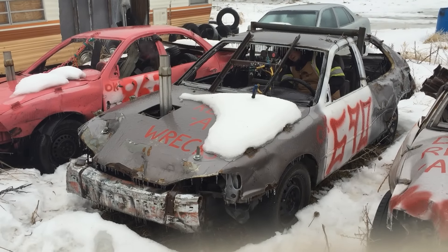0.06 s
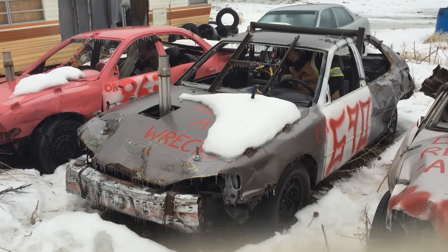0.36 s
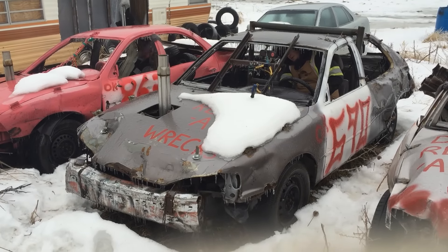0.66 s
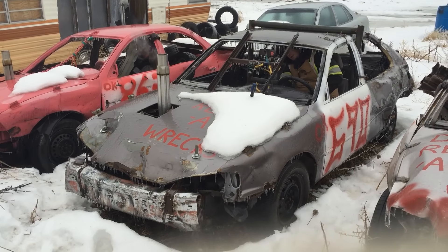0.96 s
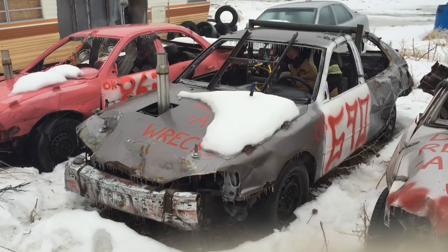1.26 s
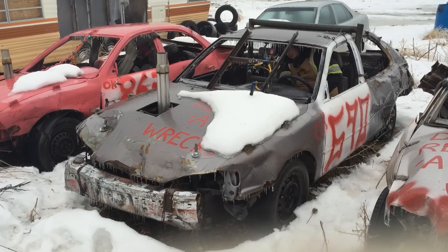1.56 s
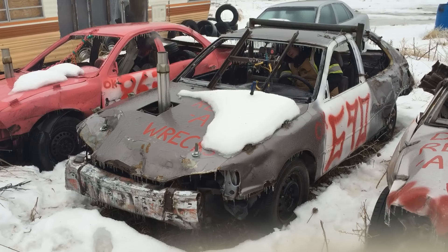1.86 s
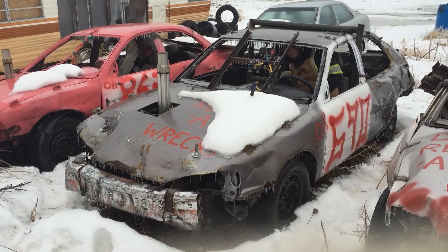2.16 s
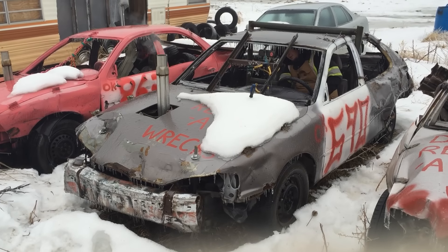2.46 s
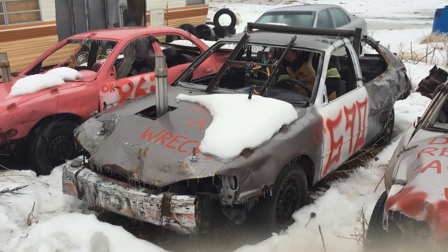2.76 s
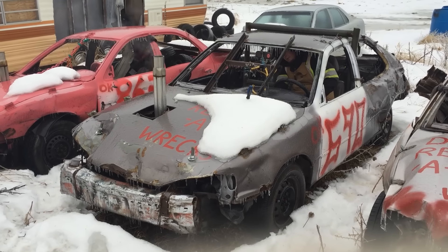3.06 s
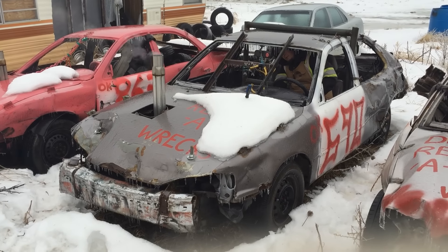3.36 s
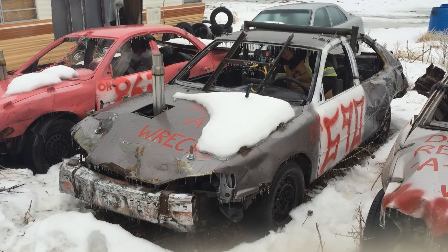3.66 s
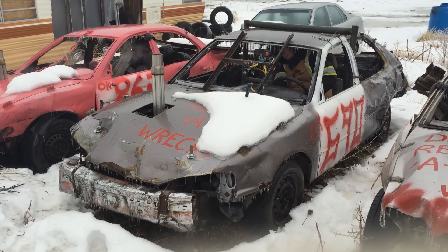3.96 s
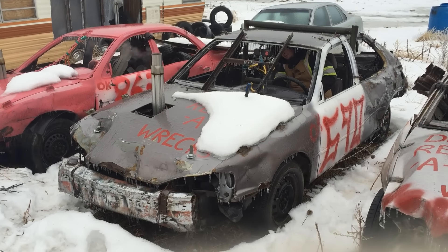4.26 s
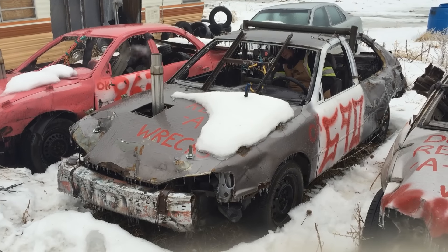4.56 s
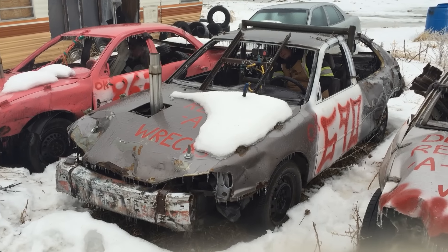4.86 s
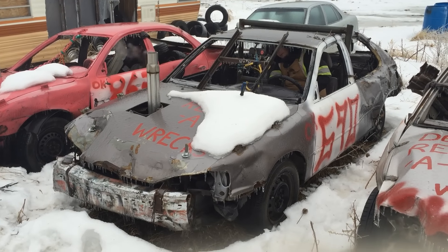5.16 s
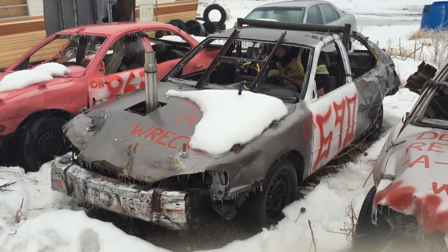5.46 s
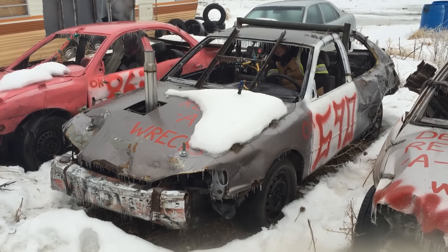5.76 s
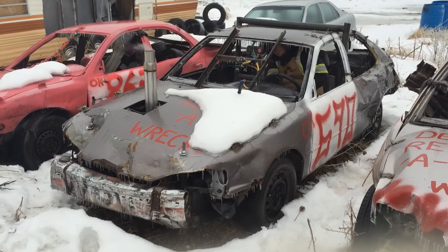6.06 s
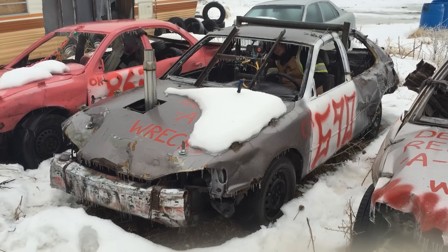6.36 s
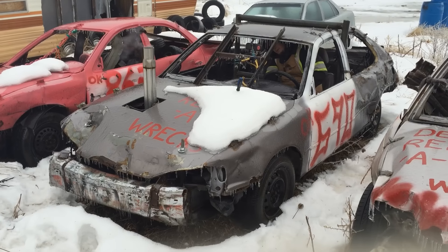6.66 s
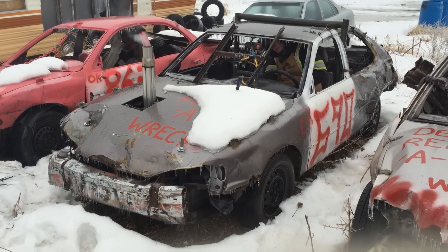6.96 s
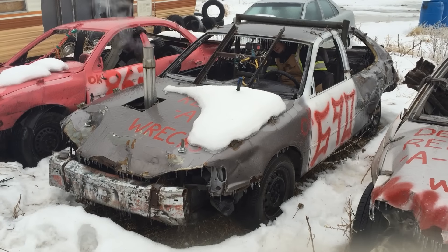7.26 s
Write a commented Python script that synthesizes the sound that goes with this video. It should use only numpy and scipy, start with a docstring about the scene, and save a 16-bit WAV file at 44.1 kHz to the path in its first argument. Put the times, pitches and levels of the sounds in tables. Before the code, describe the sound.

Starter gears grind in a labored, irregular rhythm as a car engine turns over without starting. Quick hisses and thin whistles come between the strokes, and scattered misfires crack and boom in the exhaust over a faint rumble. Near the end comes a ragged run of dull puffs, then more backfires as the cranking continues. It is heard from a few metres off in an open yard with almost no echo.

```python
"""Cold engine that will not start.

A four-cylinder car with an open exhaust stack is cranked in a snowy yard and never catches.
The starter gears grind and sag in pitch against each compression; air hisses and whistles out of
the engine. Stray firings spit, boom in the stack and break into a short sputter."""
import sys
import numpy as np
from scipy import signal
from scipy.fft import rfft, irfft, next_fast_len
from scipy.io import wavfile
from scipy.ndimage import map_coordinates

SR = 44100
rng = np.random.default_rng(int(sys.argv[2]) if len(sys.argv) > 2 else 0)


def unload_audio(sound):
    """Save the sound as a 16-bit wav file, at the path given as the first command line argument."""
    columns = np.transpose(np.atleast_2d(sound))
    # keep every value between -1 and 1, then stretch to whole-number steps
    steps = np.round(np.clip(columns, -1, 1) * 32767)
    wavfile.write(sys.argv[1], SR, steps.astype(np.int16))


N = 327222
T = np.arange(N) / SR


def amp(db):
    """Decibels to gain."""
    return 10 ** (np.asarray(db) / 20)


def unit(x):
    """Scale to rms 1."""
    return x / np.sqrt(np.mean(x ** 2) + 1e-20)


def wobble(rate_hz):
    """Smooth random curve, rate_hz knots a second."""
    return map_coordinates(rng.standard_normal(int(N * rate_hz / SR) + 4), [T * rate_hz])


def noise(rough_db=0, rate_hz=400):
    """White noise of rms 1 whose strength flutters."""
    return unit(rng.standard_normal(N) * amp(rough_db * wobble(rate_hz)))


def phase_of(hz):
    """Running phase in radians of a varying frequency."""
    return 2 * np.pi * np.cumsum(hz) / SR


def swell(peak_s, rise_s, fall_s, shape=1.53):
    """Hump of height 1 at peak_s."""
    return np.exp(-np.abs((T - peak_s) / np.where(T < peak_s, rise_s, fall_s)) ** shape)


def burst(start_s, attack_s, decay_s):
    """Quick rise, exponential fall."""
    t = np.maximum(T - start_s, 0)
    return (1 - np.exp(-t / attack_s)) * np.exp(-t / decay_s)


def colour(x, spectrum, resonances=()):
    """Causal filter from (Hz, dB) points plus resonance humps; keeps the power of white noise."""
    size = 2 * next_fast_len(N // 2 + SR // 4)
    hz = np.fft.rfftfreq(size, 1 / SR)
    points_hz, points_db = np.transpose(spectrum)
    db = np.interp(np.log(hz + 1), np.log(points_hz + 1), points_db)
    for centre_hz, width_hz, hump_db in resonances:
        db += hump_db / (1 + (2 * (hz - centre_hz) / width_hz) ** 2)
    cepstrum = irfft(np.log(unit(amp(db))), size)
    cepstrum[1:size // 2] *= 2  # fold to minimum phase
    cepstrum[size // 2 + 1:] = 0
    return irfft(rfft(x, size) * np.exp(rfft(cepstrum)), size)[:N]


def cavity(x, spacing_hz, feedback):
    """Waves bouncing inside a cavity make evenly spaced resonances."""
    size = next_fast_len(N + SR // 4)
    round_trip = np.exp(-2j * np.pi * np.fft.rfftfreq(size, 1 / SR) / spacing_hz)
    return irfft(rfft(x, size) * np.sqrt(1 - feedback ** 2) / (1 - feedback * round_trip), size)[:N]


def yard(x, wet_db=-13, t60_s=0.18):
    """Short scatter from the engine bay and the cars around; snow swallows the rest."""
    t = T[:SR // 4]
    tail = rng.standard_normal(len(t)) * amp(-60 * t / t60_s) * (t > .003)
    above_bass = signal.sosfilt(signal.butter(2, 400, "high", fs=SR, output="sos"), x)
    return x + amp(wet_db) * signal.fftconvolve(above_bass, tail / np.linalg.norm(tail))[:N]


# Body shake. Each row: time in seconds, level in dB.
RUMBLE_LEVELS = [(0, -38), (.93, -47.5), (1.4, -35), (2.0, -45.5), (2.6, -41.5), (4.7, -42.5), (5.6, -33.5),
                 (7.4, -36.5)]
# Body shell response. Each row: frequency in Hz, relative gain in dB.
BODY_SPECTRUM = [(25, -32), (45, 0), (65, -1.5), (100, -2.5), (160, -14.5), (300, -16), (600, -35.5),
                 (1200, -62)]


def rumble():
    """The rocking engine shakes the bare body shell."""
    level_db = np.interp(T, *np.transpose(RUMBLE_LEVELS))
    return amp(level_db) * colour(noise(), BODY_SPECTRUM, [(62.4, 42, 4.0)])


# Late burning. Each row: start in seconds, level in dB, brightness in dB.
PUFFS = [(.415, -31, -13), (5.485, -27.5, -16), (5.813, -24.5, -13), (5.86, -23, -21), (5.934, -17.5, -1.5),
         (6.081, -16, -24), (6.119, -12.5, -9), (6.22, -17.5, -23), (6.273, -15, -10), (6.343, -16, -0.5),
         (6.385, -16.5, -12), (7.11, -23.5, -15)]
# A puff's dull body and brighter flutter. Each row: frequency in Hz, relative gain in dB.
PUFF_SPECTRUM = [(30, -17), (70, 2), (130, 0.5), (200, -5), (330, -18), (700, -61)]
FLUTTER_SPECTRUM = [(80, -7.5), (180, 4), (330, 2), (600, -10.5), (1000, -25), (2500, -55)]


def sputter(puff_decay_s=0.033, wake_db=-26, wake_decay_s=0.1):
    """Unburnt fuel flares in ragged puffs; every boom also leaves a turbulent wake in the pipe."""
    dull, bright = np.zeros(N), np.zeros(N)
    for s, _, _, boom_db in FIRINGS:
        dull += amp(boom_db + wake_db) * burst(s + BOOM_DELAY_S, 0.0063, wake_decay_s)
    for s, db, bright_db in PUFFS:
        puff = amp(db) * burst(s, 0.0023, puff_decay_s)
        dull += puff
        bright += puff * amp(bright_db)
    eddies = colour(dull * noise(rough_db=3), PUFF_SPECTRUM)
    flutter = colour(bright * noise(rough_db=3), FLUTTER_SPECTRUM)
    return eddies + flutter


# Flames in the pipe. Each row: start in seconds, relative level in dB, life in seconds.
FLAMES = [(1.171, -20.5, 0.13), (1.482, -24, 0.13), (5.821, -17.5, 0.079), (6.917, -16.5, 0.037)]
# A flame's note. Each row: time since lighting in seconds, pitch in Hz.
FLAME_PITCH = [(0, 59.6), (.04, 57.7), (.085, 99), (.13, 103), (.25, 100.8)]


def hoots(gain_db=3.5, third_harmonic_db=-27, fade_s=0.056):
    """A flame keeps the pipe sounding; its note climbs as the gas heats."""
    out = np.zeros(N)
    for s, db, life_s in FLAMES:
        t = np.clip(T - s, 0, 1)
        phase = phase_of(np.interp(t, *np.transpose(FLAME_PITCH)) * (t > 0))
        flame = (1 - np.exp(-t / 0.0011)) / np.sqrt(1 + np.exp(2 * (t - life_s) / fade_s))
        out += amp(db + gain_db) * flame * (np.sin(phase) + amp(third_harmonic_db) * np.sin(3 * phase))
    return out


def pressure_pulses(boom_attack_s=0.0037, push_db=-19, push_lag_s=0.01396, push_attack_s=0.025):
    """Firings boom, compressions push softly. Each row: start in seconds, dB, attack in seconds."""
    pulses = [(s + BOOM_DELAY_S, db, boom_attack_s) for s, _, _, db in FIRINGS]
    whistles_s = [s for s, *_, whistle_db in VALVE_LEAKS if whistle_db > 0]
    for s, _, load_s in compressions():
        whistled_away = any(s < leak_s < s + load_s for leak_s in whistles_s)
        if not whistled_away:
            pulses.append((s + load_s + push_lag_s, push_db, push_attack_s))
    return pulses


# Exhaust stack modes. Each row: resting frequency in Hz, relative level in dB, T60 in seconds.
STACK_MODES = [(64.56, -10, 0.55), (75.8, 0, 0.16), (123.3, -3, 0.26), (169.3, -13.5, 0.62)]


def stack(soft_hz=45, hot_sharpening=0.09, cooling_s=0.032):
    """Pressure pulses ring the stack, sharp while the gas is hot; slow ones favour the lowest mode."""
    out, t = np.zeros(N + SR), T[:SR // 2]
    lowest_hz = STACK_MODES[0][0]
    warped_s = np.cumsum(1 + hot_sharpening * np.exp(-t / cooling_s)) / SR
    for s, db, attack_s in pressure_pulses():
        onset = amp(db) * (1 - np.exp(-t / attack_s))
        for hz, mode_db, t60_s in STACK_MODES:
            scatter = rng.standard_normal()
            reach = 1 / np.hypot(1, attack_s * (hz - lowest_hz) * hz / soft_hz)
            decay = amp(mode_db + 0.82 * scatter - 60 * t / t60_s)
            tone = np.sin(2 * np.pi * hz * (1 + 0.022 * scatter) * warped_s)
            out[round(s * SR):][:len(t)] -= onset * reach * decay * tone
    return out[:N]


# Single cylinder firings. Each row: blast peak in seconds, then relative blast, bark and boom in dB.
FIRINGS = [(1.488, -20.5, -23, -13.5), (2.525, -13, -27, -13.5), (3.019, -14, -35, -9.5),
           (3.475, -15, -33, -7.5), (5.247, -13.5, -21.5, -6), (5.812, -20, -19, -20),
           (6.779, -15, -14.5, -5.5), (7.42, -23.5, -16.5, -20)]
BOOM_DELAY_S = 0.01875  # from blast to stack
# Sharp backfires. Each row: peak in seconds, relative jet dB, jet fall in seconds, relative bark dB.
BACKFIRES = [(.181, -22.5, 0.032, -25.5), (1.169, -23, 0.0042, -20.5), (6.912, -19, 0.0027, -13),
             (7.38, -17.5, 0.028, -31.5)]


def barks(gain_db=5, lead_s=0.0067, firing_decay_s=0.019, backfire_decay_s=0.011):
    """A misfire cracks through the midrange; the shorter it is, the sharper it starts."""
    cracks = [(s, db, firing_decay_s) for s, _, db, _ in FIRINGS]
    cracks += [(s, db, backfire_decay_s) for s, _, _, db in BACKFIRES]
    force = sum(amp(db) * burst(s - lead_s, 0.25 * decay_s, decay_s) for s, db, decay_s in cracks)
    return amp(gain_db) * crackle(force)


# Midrange crack. Each row: frequency in Hz, relative gain in dB.
BARK_SPECTRUM = [(100, -13), (280, 10.5), (430, -4), (800, -3), (1100, 0.5), (2100, 2.5), (3500, -25),
                 (9000, -32)]


def crackle(force):
    """The rough noise of a bark."""
    return colour(force * noise(rough_db=2.5), BARK_SPECTRUM)


# Compressed air past a valve. Each row: peak in seconds, relative dB, rise in seconds, whistle in dB.
VALVE_LEAKS = [(.226, -24, 0.023, 1.5), (.378, -23, 0.036, -21), (.84, -25.5, 0.042, 4),
               (1.075, -25, 0.057, -28), (1.366, -23.5, 0.031, 4.5), (1.866, -24, .04, 4),
               (2.07, -23.5, .043, -29), (3.946, -25, .037, -1.5), (4.125, -31, 0.052, -9),
               (4.619, -25, .034, 2.5), (4.797, -29.5, .03, -17), (5.691, -27, .04, 3),
               (6.164, -28, 0.034, 2), (7.029, -19.5, 0.021, 0)]


def escapes(leak_fall_s=.026, backfire_rise_s=0.0041, backfire_whistle_db=4.5, blast_fall_s=0.0098):
    """All gas jets. Each row: peak in seconds, relative dB, rise and fall in seconds, whistle in dB."""
    rows = [(s, db, rise_s, leak_fall_s, whistle_db) for s, db, rise_s, whistle_db in VALVE_LEAKS]
    rows += [(s, db, backfire_rise_s, fall_s, backfire_whistle_db) for s, db, fall_s, _ in BACKFIRES]
    for s, db, *_ in FIRINGS:
        rows += [(s - .012, db - 16, 0.019, blast_fall_s, 4),  # blow-by whistles out first
                 (s, db, 0.014, blast_fall_s, 1),  # blast
                 (s + 0.034, db - 17.5, 0.027, 0.058, -6)]  # thin exhaust hiss trails off
    return rows


# Port hiss, throat whistle and thin spray. Each row: frequency in Hz, relative gain in dB.
HISS_SPECTRUM = [(80, -33), (200, -5.5), (450, -9.5), (900, -5), (2000, -1), (3400, -4), (5500, -6),
                 (8000, -4.5), (10500, -15.5), (12500, -11), (15800, -18)]
THROAT_SPECTRUM = [(1500, -54.5), (2700, -14), (3300, -8), (4100, -5), (4700, -17), (6000, -37.5),
                   (12000, -39)]
SPRAY_SPECTRUM = [(3000, -23), (7000, 3), (13500, 6)]
# Port and throat resonances. Each row: centre in Hz, width in Hz, boost in dB.
PORT_MODES = [(1192, 14, 10), (8060, 150, -7), (9110, 140, 2), (11740, 170, 7.5)]
THROAT_MODES = [(3257, 82, 10.5), (3320, 105, -5), (3920, 910, 0), (5390, 180, 20.5)]


def jets(hiss_db=1, whistle_db=-1, spray_db=-4, edge_hz=4010, edge_db=-10, steepness=1.31):
    """Gas hisses through the ports; it sounds the throat near 4 kHz or sprays out thin and bright."""
    flow, tonal, thin = np.zeros((3, N))
    for s, db, rise_s, fall_s, tone_db in escapes():
        speed = swell(s, rise_s, fall_s)
        rush = amp(db) * speed ** steepness  # hiss grows faster with speed than the whistle
        flow += rush
        tonal += amp(db + tone_db) * speed
        thin += rush * max(1 - amp(tone_db), 0)
    hiss = colour(flow * noise(rough_db=1.8, rate_hz=800), HISS_SPECTRUM, PORT_MODES)
    whistle = colour(tonal * noise(rough_db=0.5, rate_hz=300), THROAT_SPECTRUM, THROAT_MODES)
    spray = colour(thin * noise(rough_db=2.2), SPRAY_SPECTRUM, PORT_MODES)
    flap = 1 + .04 * wobble(250)  # the jet flaps over the valve's edge
    edge = tonal * unit(amp(2.7 * wobble(300)) * np.sin(phase_of(edge_hz * flap)))
    return amp(hiss_db) * hiss + amp(whistle_db) * whistle + amp(spray_db) * spray + amp(edge_db) * edge


# The pinion catches up with the flywheel. Each entry: time in seconds.
REGRIPS_S = [.327, 3.647, 5.406, 7.126]


def squeaks(level_db=-22, overrun_s=0.0814, pitch_hz=1650, glide=0.037, clack_db=-5, clack_s=0.0093):
    """The overrun clutch slips after each ignition and regrips: a falling note and a clack of teeth."""
    notes, knocks = np.zeros(N), np.zeros(N)
    waver = 1 + 0.019 * wobble(300)
    slips_s = [s + overrun_s for s, *_ in [*FIRINGS, *BACKFIRES]]
    for s in [*slips_s, *REGRIPS_S]:
        hz = pitch_hz * waver * (1 - glide * np.tanh((T - s) / 0.0053))
        notes += swell(s, 0.0033, 0.0075) * np.sin(phase_of(hz))
        knocks += burst(s - .003, 0.0023, clack_s)
    clacks = colour(knocks * noise(), GEAR_SPECTRUM, HOUSING_MODES)
    return amp(level_db) * (notes + amp(clack_db) * clacks)


# The starter takes up a compression. Each entry: start in seconds.
STROKES_S = [.003, .17, .318, .467, .644, .785, .958, 1.247, 1.325, 1.565, 1.696, 1.82, 1.992, 2.186, 2.375,
             2.592, 2.725, 2.873, 3.088, 3.199, 3.339, 3.545, 3.641, 3.766, 3.91, 4.06, 4.258, 4.422, 4.555,
             4.738, 4.934, 5.1, 5.32, 5.4, 5.517, 5.655, 5.892, 5.998, 6.135, 6.272, 6.475, 6.64, 6.853,
             6.99, 7.117, 7.249]


def compressions(level_db=-27, load_share=.63, longest_s=.125, relief_db=-3.5, relief_s=.14):
    """Starter loads, eased by a fresh firing. Each row: start in seconds, dB, load time in seconds."""
    rows = []
    for s, stroke_s in zip(STROKES_S, np.diff(STROKES_S, append=N / SR)):
        relief = sum(np.exp((fired_s - s) / relief_s) for fired_s, *_ in FIRINGS if fired_s < s)
        load_s = min(load_share * stroke_s, longest_s) * np.exp(-.5 * relief)
        rows.append((s, level_db + relief_db * relief, load_s))
    return rows


# Slowing under compression. Each row: elapsed share of the load time, tooth rate in Hz.
TOOTH_RATE_SAG = [(0, 1326), (.28, 1211), (.52, 1033), (.78, 872.3), (1.1, 776.2), (1.7, 742.5)]


def gear_load(attack_s=0.0023, release_s=0.014, clash=0.18, slowing_db=-3):
    """Load and tooth rate: each compression slows the gears, which run slack past top centre."""
    load, tooth_hz = np.zeros(N), np.full(N, float(TOOTH_RATE_SAG[0][1]))
    for s, db, load_s in compressions():
        start = round(s * SR)
        t = T[:N - start][:SR // 2]
        span = slice(start, start + len(t))
        take_up = (1 - np.exp(-t / attack_s)) * (1 + clash * np.exp(-t / 0.024))  # backlash jolts shut
        level = amp(db + slowing_db * np.minimum(t / load_s, 1) ** 2)
        let_go = 1 / np.sqrt(1 + np.exp(np.minimum(2 * (t - load_s) / release_s, 60)))
        load[span] += level * take_up * let_go
        tooth_hz[span] = np.interp(t / load_s, *np.transpose(TOOTH_RATE_SAG))
    return load, tooth_hz


# Gear tones. Each row: multiple of the tooth rate, relative level in dB.
GEAR_TONES = [(1, 5), (1.2, -1.5), (2, 5), (3, -5), (4, -0.5)]
# Gear train response. Each row: frequency in Hz, relative gain in dB.
GEAR_SPECTRUM = [(260, -57), (450, -19.5), (538, -15.5), (725, -7.5), (816, -11), (1010, -7), (1460, -2.5),
                 (2050, -5), (2690, -6.5), (3510, -3), (5170, -11), (5660, -7), (7620, -20), (13000, -25.5),
                 (15800, -27.5)]
# Bell housing resonances. Each row: centre in Hz, width in Hz, boost in dB.
HOUSING_MODES = [(557, 150, -4.5), (729, 57, 8), (998, 65, 5.5), (1350, 86, -4.5), (1820, 380, 2),
                 (2060, 72, 8), (2470, 65, 0.5), (2980, 140, 4.5)]


def starter(whine_db=-3.1, grind_db=-2.5, slack_db=-40, bite=0.44, pinion_teeth=20, runout_db=2.3):
    """Meshing teeth whine and grind under load; the off-centre pinion presses harder once a turn."""
    load, tooth_hz = gear_load()
    shudder = 1 + .027 * wobble(280) + .032 * wobble(45)
    phase = phase_of(tooth_hz * shudder)
    whine = unit(sum(amp(db + 4.46 * wobble(90)) * np.sin(k * phase) for k, db in GEAR_TONES))
    grind = unit(noise(rough_db=-1.5, rate_hz=330) * (1 + bite * np.cos(phase)))
    press = unit(amp(runout_db * np.sin(phase / pinion_teeth) + 1.5 * np.tanh(wobble(60))))
    mesh = amp(whine_db) * unit(colour(whine, GEAR_SPECTRUM, HOUSING_MODES))
    mesh += amp(grind_db) * colour(grind, GEAR_SPECTRUM, HOUSING_MODES)
    slack = amp(slack_db) * colour(noise(rough_db=-1.5, rate_hz=170), GEAR_SPECTRUM, HOUSING_MODES)
    return load * press * mesh + slack


def scene():
    """The engine a few metres off; blasts ring hollow in the manifold, gears in the bell housing."""
    gas = cavity(jets() + barks(), spacing_hz=1006, feedback=0.37)
    gas = cavity(gas, spacing_hz=235, feedback=.27)
    gears = cavity(starter(), spacing_hz=344, feedback=.18)
    return yard(gears + squeaks() + gas + stack() + hoots() + sputter() + rumble())[None]


def record(dry, low_cut_hz=44, top_hz=15850):
    """Thin the deepest bass and remove everything above top_hz."""
    size = next_fast_len(N + SR // 4)
    hz = np.fft.rfftfreq(size, 1 / SR)
    passband = hz ** 4 / (hz ** 4 + low_cut_hz ** 4) * (hz < top_hz)
    return irfft(rfft(dry, size) * passband, size)[..., :N]


dry = scene()
out = record(dry)
unload_audio(out)
```